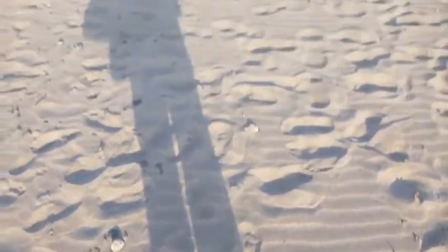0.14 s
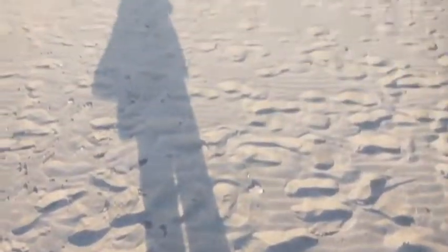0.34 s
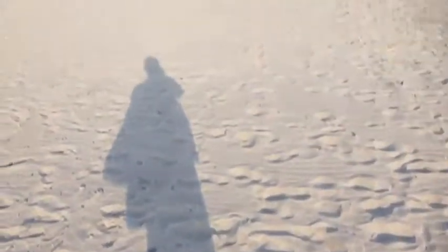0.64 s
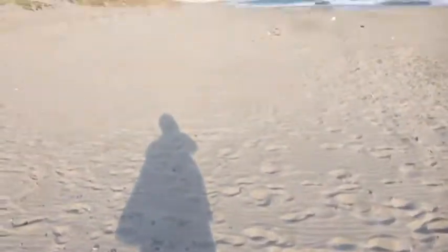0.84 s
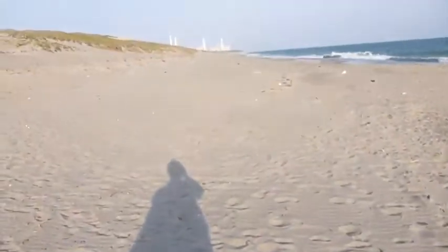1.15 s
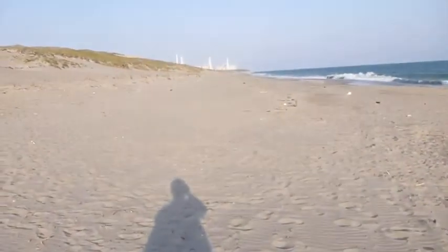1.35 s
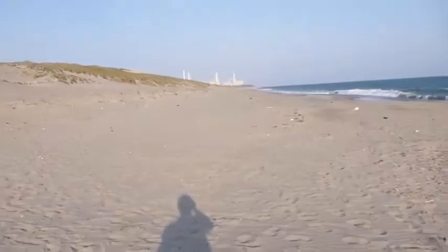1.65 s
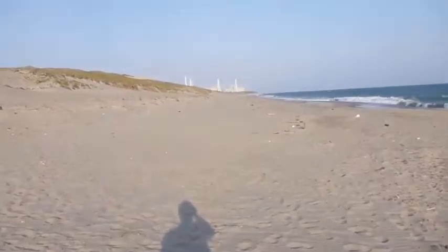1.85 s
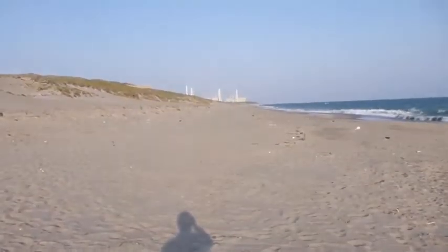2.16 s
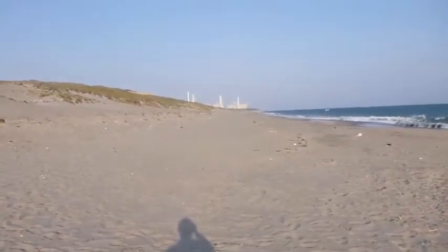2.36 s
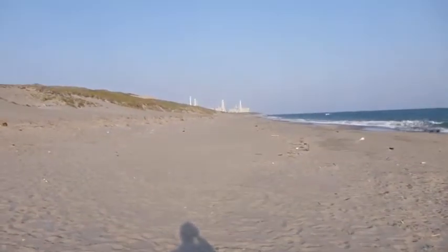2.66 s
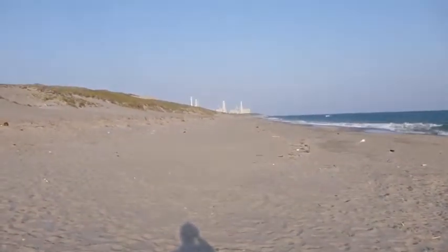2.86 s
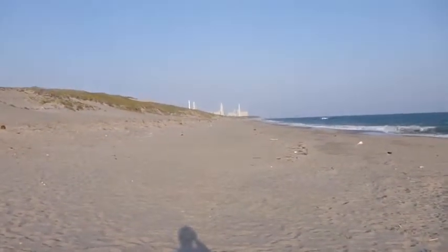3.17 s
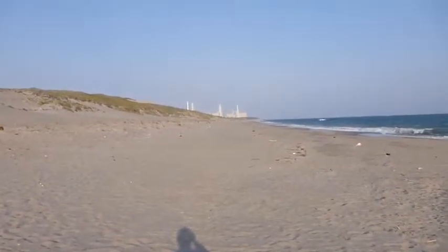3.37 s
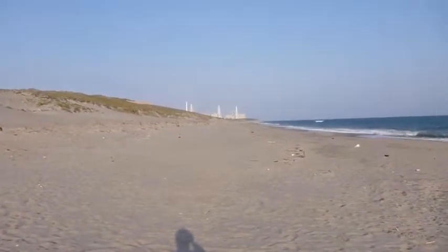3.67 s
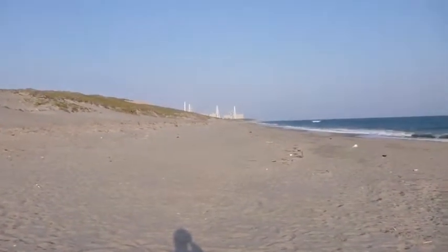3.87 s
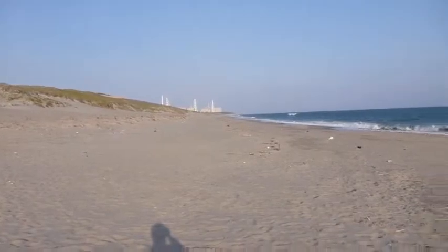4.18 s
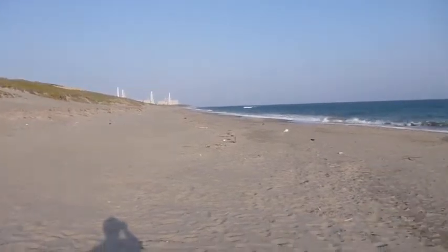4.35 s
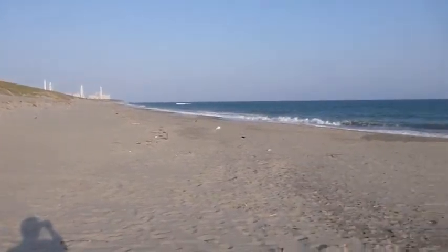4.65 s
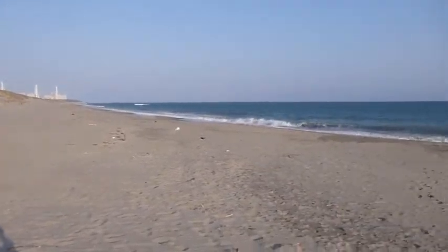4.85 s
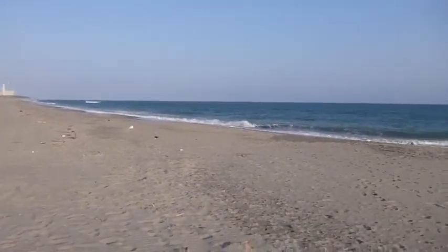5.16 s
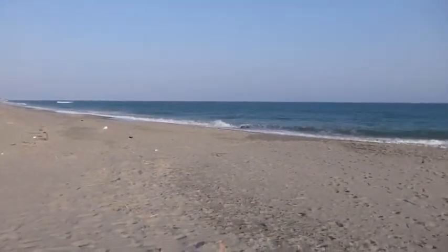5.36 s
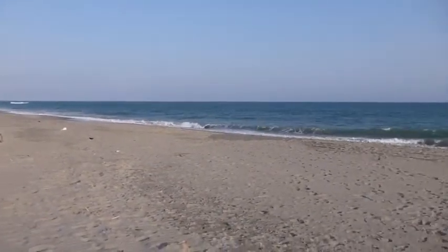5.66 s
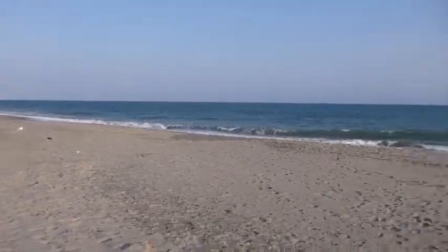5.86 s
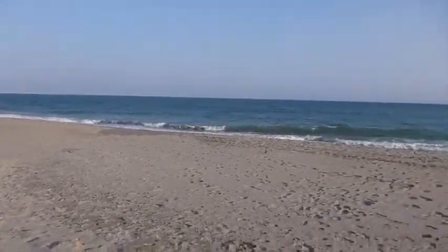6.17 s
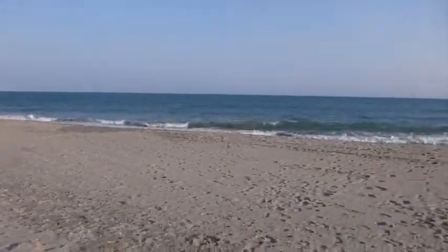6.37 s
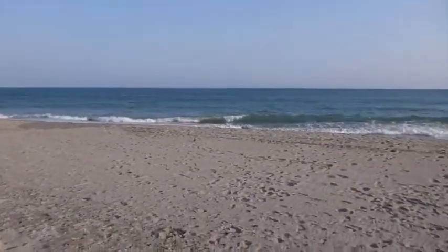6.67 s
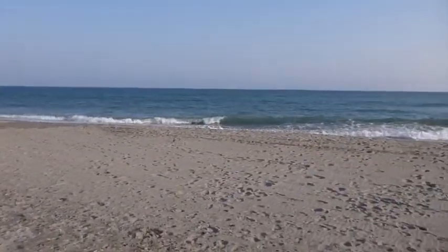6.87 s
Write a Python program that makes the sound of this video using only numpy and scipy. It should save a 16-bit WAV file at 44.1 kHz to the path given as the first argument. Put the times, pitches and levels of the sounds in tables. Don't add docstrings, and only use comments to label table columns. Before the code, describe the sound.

Distant surf hisses steadily on a sandy beach while wind slaps the microphone hard near the start, then keeps fluttering and puffing, with faint hoots later.

```python
import sys
import numpy as np
from scipy import signal
from scipy.fft import rfft, irfft
from scipy.io import wavfile
from scipy.ndimage import uniform_filter1d

SR = 44100
rng = np.random.default_rng(int(sys.argv[2]) if len(sys.argv) > 2 else 0)


def gain_from_db(level_db):
    decades = np.asarray(level_db, float) / 20
    return 10 ** decades


def store_pcm(level_fs):
    pcm = np.round(np.clip(level_fs, -1, 1) * 32767).astype(np.int16)
    wavfile.write(sys.argv[1], SR, np.atleast_2d(pcm).T)


N = 309582

# (time [s], hiss level [dB], wash against hiss [dB])
SURF_LEVELS = [(0, -48, .5), (.7, -48, 1.5), (.9, -47.5, 2), (1.099, -48.5, -0.5), (1.35, -51, -0.5),
               (1.6, -52.5, 1), (1.9, -54.5, 1), (2.4, -57, .5), (2.7, -55.5, -0.5), (3.1, -57, 0),
               (3.5, -54.5, -2), (4, -56.5, -1), (4.5, -56.5, -0.5), (5, -54.5, -0.5), (5.5, -52.5, -.5),
               (6.1, -51, 0), (6.6, -50, 0), (7.02, -49.5, -2)]
# (frequency [Hz], spectrum level [dB per Hz])
FOAM_SPECTRUM = [(25, -11), (60, -16.5), (130, -9.5), (230, 0.5), (550, 0), (1000, -3), (1500, -10.5),
                 (2500, -12.5), (3300, -18.5), (5000, -23), (7500, -29), (10500, -29.5), (13000, -28),
                 (15800, -41.5)]
CALM_DB, ROAR_PER_DB, BOOM_PER_DB, BOOM_DB = -49.5, 0.08, 0.4, 1

# (time [s], level [dB])
WIND_LEVELS = [(0, -58), (.66, -57), (.82, -43), (1.55, -44.5), (1.95, -45), (2.38, -44), (2.52, -49.5),
               (2.83, -41.5), (2.95, -50), (3.1, -52), (3.25, -46), (3.7, -46), (4.2, -44.5), (4.6, -54),
               (4.75, -52.5), (5.7, -53), (6.5, -43), (7.02, -54)]
FLUTTER_DB, FLUTTER_PER_S = 3, 24
BREEZE_DB, RIPPLE_DB, RIPPLE_HZ = 4, 3.5, 235

# (time [s], spread [ms], level [dB], tearing [dB])
GUST_PUFFS = [(.828, 6, -9, -4), (.845, 3.93, -13, -6), (.857, 4.3, -15, 2), (.880, 5.2, -10, -2),
              (0.911, 7.2, -20, -2), (.951, 12.8, -13.5, -2.5), (.992, 8, -17.5, 2.5),
              (1.024, 10.3, -20, 3), (1.059, 8, -18, 2.5), (1.095, 15.7, -21, 0), (1.14, 20, -23, -7),
              (1.205, 16, -19.5, -5), (1.245, 16, -21, 9.5), (1.275, 10.7, -18, 3), (1.326, 32, -29.5, 1),
              (1.364, 2.74, -17.5, 1.5), (1.442, 17.4, -28, 5), (1.509, 18, -23, 5)]
GUST_S, GUST_HZ, SLACK_HZ, SLACKEN_S = .82, 560, 300, .25
# (time [s], spread [ms], level [dB], eddy pitch [Hz])
SINGLE_PUFFS = [(.711, 1.9, -18, 300), (1.255, 18, -25.5, 681), (1.612, 15.6, -28.5, 244),
                (1.686, 3.45, -25.5, 171.5), (1.807, 9.5, -28.5, 317.6), (2.06, 14, -44, 222),
                (2.206, 2.53, -21, 264), (2.338, 11.6, -26.5, 302.2), (2.442, 10.5, -33.5, 267),
                (2.583, 30, -35, 254.5), (2.758, 10.3, -30.5, 238), (2.831, 15.2, -27, 240),
                (3.039, 11.8, -34, 213), (3.235, 31.3, -29, 261), (3.443, 9.7, -23.5, 257),
                (3.585, 10.5, -31, 370.7), (3.681, 17.3, -25, 273.6), (3.834, 19.7, -30, 257.3),
                (3.897, 14.8, -30.5, 249), (3.98, 21.7, -32, 270), (4.155, 11.3, -26, 271),
                (4.195, 10, -26.5, 268.6), (4.279, 6.1, -33, 255), (4.627, 7, -33, 167),
                (6.219, 3, -26.5, 401), (6.412, 10.2, -28, 311.4), (6.464, 5.8, -27, 284),
                (6.521, 10.2, -31.5, 247.6), (6.734, 16.6, -31.5, 306), (7.008, 8.1, -31, 256.5)]
TIGHT, TIGHT_BY_PITCH, TIGHT_BY_SPREAD = 4.92, 1.24, -0.24
# (pitch ratio, level [dB], tightness)
TORN_SHREDS = [(2.099, -19.5, 7.9), (4.202, -39, 9.7)]
WAKE_HZ, WAKE_DB, WAKE_SHARE = 115.5, -43.5, 0.57
# (time [s], peak level [dB], pitch [Hz])
LONE_EDDIES = [(0.8184, 3.5, 488), (.877, -8, 640), (1.018, -11.5, 560), (1.192, -27, 590),
               (1.215, -17, 610), (1.338, -29, 545), (1.363, -19, 394), (1.397, -17.5, 386),
               (1.483, -21, 504), (1.517, -13, 420), (1.599, -22, 480), (1.82, -20.5, 418),
               (1.952, -28, 240), (2.337, -16, 376), (2.852, -21, 383), (3.161, -24, 593),
               (3.226, -23, 450), (3.424, -19, 447), (3.56, -14, 590), (3.582, -7.5, 373),
               (3.668, -21, 332), (3.964, -19.5, 446), (4.066, -19, 199), (4.134, -14.5, 412),
               (4.905, -27, 169), (5.181, -26, 226), (5.781, -25, 280), (6.282, -14, 332),
               (6.629, -17, 360), (6.719, -13, 327)]
SLAP_TIGHT, SLAP_BY_PITCH = 4.4, .8
# (time [s], peak level [dB], pitch [Hz], tightness)
SHORT_TICKS = [
    (.8185, -33, 2760, 3.3),
    (.888, -32, 4000, 2.4),
    (0.989, -46, 2500, 2.2),
    (1.388, -41.5, 4480, 1.1),
    (1.413, -43.5, 5000, 1.4),
    (1.454, -37, 2300, 30),
]
# (time [s], spread [ms], level [dB], pitch [Hz])
BOTTLE_HOOTS = [
    (4.838, 10.3, -37.5, 197),
    (5.765, 16, -34, 282.6),
    (6.05, 28, -32, 257.5),
    (6.15, 25.4, -36.5, 253),
    (6.218, 3.4, -17.5, 264),
    (6.254, 5.1, -22.5, 285),
    (6.278, 11.8, -23.5, 300),
    (6.571, 7, -30.5, 347),
]
HOOT_TIGHT = 41

# (starting wind level [dB], ducking rate [dB/s per dB above], recovery time [s])
GAIN_STAGES = [(-21, 25, 0.43), (-33, 6.5, 0.076)]
SENSE_MS, SENSE_LOW_DB = 10.3, 4.5
LAG_MS = 25
# (time [s], duck [dB])
AIR_SHOVES = [(.72, 4), (1.09, 4.5), (1.53, 4), (1.82, 3.5), (2.25, 4), (2.74, 5.5), (2.85, 3), (3.28, 2.5),
              (3.58, 5.5), (3.68, 1), (4.03, 1.5), (4.6, 2.5), (6.23, 1), (6.4, 0.5), (6.54, 3)]
SHOVE_S, SHOVE_BACK_S = 0.0098, 0.08

LOW_CUT_HZ, TOP_HZ = 65, 15720
# (frequency [Hz], width [Hz], depth [dB])
MOTOR_NOTCHES = [(2870, 257, -25), (7900, 110, -5), (11720, 1400, -13), (11720, 220, -16)]


def walk(rate):
    hold = int(SR / rate)
    held = np.repeat(rng.standard_normal(N // hold + 1), hold)
    return 0.79 * uniform_filter1d(uniform_filter1d(held, hold), hold)[:N]


def unit(x):
    return x / np.sqrt(np.mean(x ** 2))


def surf(hiss_db, roar_db, wash_db, boom_db):
    hz = np.maximum(np.arange(N // 2 + 1) * SR / N, 1)
    foam_hz, foam_db = np.transpose(FOAM_SPECTRUM)
    colour_db = np.interp(np.log(hz), np.log(foam_hz), foam_db)
    noise = rfft(rng.standard_normal(N)) * gain_from_db(colour_db)
    noise /= np.std(irfft(noise * (hz > 4000) * (hz < 11000), N))
    bands = np.arange(20)
    swell = uniform_filter1d(np.array([walk(6.2) for _ in bands]), size=5, axis=0)
    out = 0
    for k in bands:
        place = 2 * np.log2(hz / 22) - k
        band = irfft(noise * np.cos(np.pi / 2 * np.clip(place, -1, 1)) ** 2, N)
        centre = 22 * 2 ** (k / 2)
        lift_db = roar_db / (1 + (centre / 700) ** 2)
        lift_db = lift_db + wash_db * np.exp(-np.log(centre / 1600) ** 2 / 0.22)
        lift_db += boom_db / (1 + (centre / 220) ** 4)
        out = out + band * gain_from_db(lift_db + 0.89 * swell[k] + 0.38 * walk(25))
    return out * gain_from_db(hiss_db)


def eddy(t, hz, phase, tight):
    turn = 2 * np.pi * hz * t / tight
    envelope = (1 + turn ** 2) ** (-(tight + 1) / 2)
    return envelope * np.cos((tight + 1) * np.arctan(turn) + phase)


def add(out, s, hz, gain, phase, tight):
    half = int(min(600, 2.2 * SR / hz.min()))
    reach = np.arange(-half, half)
    place = np.round(s * SR).astype(int)[:, None] + reach
    wave = eddy(reach / SR, hz[:, None], phase[:, None], tight)
    wave = gain[:, None] * wave * np.hanning(len(reach))
    out += np.bincount(np.clip(place, 0, len(out) - 1).ravel(), wave.ravel(), len(out))


def breeze(db):
    chance = rng.random((1100, 4)).T
    pitch = 100 * np.exp(0.36 * (chance[1] - .5))
    gain = gain_from_db(-3.9 * np.log(chance[2] + 0.032))
    out = np.zeros(N)
    add(out, chance[0] * N / SR, pitch, gain, 2 * np.pi * chance[3], 2.2)
    return unit(out) * gain_from_db(db)


def ripples(db):
    chance = rng.random((1600, 4)).T
    pitch = RIPPLE_HZ * np.exp(0.82 * (chance[1] - .5))
    gain = gain_from_db(-4.5 * np.log(chance[2] + 0.018))
    out = np.zeros(N)
    add(out, chance[0] * N / SR, pitch, gain, 2 * np.pi * chance[3], 2.6)
    return unit(out) * gain_from_db(db)


def add_puff(out, s, spread, db, hz, tight, scatter_db):
    chance = rng.random((600, 4)).T
    when = np.cumsum(.35 + .9 * chance[0]) / hz
    keep = when < 6 * spread
    gain = np.exp(-(when / spread - 3) ** 2 / 4) * gain_from_db(-scatter_db * np.log(chance[2] + .02))
    off_centre = chance[1] - np.average(chance[1], weights=gain ** 2)
    pitch = hz * np.exp(1.73 / np.sqrt(tight) * off_centre)
    puff = np.zeros(int(6 * spread * SR) + 1200)
    lead = 600 / SR
    add(puff, lead + when[keep], pitch[keep], gain[keep], 2 * np.pi * chance[3][keep], tight)
    puff *= gain_from_db(db) * np.sqrt(np.sqrt(2 * np.pi) * spread * SR / np.sum(puff ** 2))
    start = int((s - 3 * spread - lead) * SR)
    out[start:start + len(puff)] += puff


def add_torn_puff(out, s, spread_ms, db, hz, tear_db):
    spread = max(spread_ms, 1.) / 1000
    tight = TIGHT * (hz / 300) ** TIGHT_BY_PITCH * (spread / .01) ** TIGHT_BY_SPREAD
    add_puff(out, s, spread, db - .3, .92 * hz, tight, scatter_db=3.5)
    wake_db = WAKE_DB + WAKE_SHARE * (db + 27)
    add_puff(out, s, max(spread, .012), wake_db, WAKE_HZ, 1.2, scatter_db=-2.5)
    for ratio, shred_db, shred_tight in TORN_SHREDS:
        add_puff(out, s, .85 * spread, db + shred_db + tear_db, ratio * min(hz, 430), shred_tight,
                 scatter_db=6.0)


def puffs():
    out = np.zeros(N + SR)
    for s, spread_ms, db, tear_db in GUST_PUFFS:
        hz = SLACK_HZ + (GUST_HZ - SLACK_HZ) * np.exp(-(s - GUST_S) / SLACKEN_S)
        add_torn_puff(out, s, spread_ms, db, hz, tear_db)
    for s, spread_ms, db, hz in SINGLE_PUFFS:
        add_torn_puff(out, s, spread_ms, db, hz, 0)
    for s, spread_ms, db, hz in BOTTLE_HOOTS:
        add_puff(out, s, spread_ms / 1000, db, hz, HOOT_TIGHT, scatter_db=3.5)
    s, db, hz = np.transpose(LONE_EDDIES)
    slap_tight = SLAP_TIGHT * (hz[:, None] / 400) ** SLAP_BY_PITCH
    add(out, s, hz, gain_from_db(db), np.full(len(s), -1.3), slap_tight)
    s, db, hz, tight = np.transpose(SHORT_TICKS)
    add(out, s, hz, gain_from_db(db), 0 * s, tight[:, None])
    return out[:N]


def ducking(wind):
    level_db = 10 * np.log10(uniform_filter1d(wind ** 2, int(SENSE_MS * SR / 1000)) + 1e-9)
    held = 0
    for db, rate, back_s in GAIN_STAGES:
        excess_db = np.maximum(level_db - db, 0)
        held = held + signal.lfilter([rate / SR], [1, -np.exp(-1 / (back_s * SR))], excess_db)
    pole = np.exp(-1000 / (LAG_MS * SR))
    gain_db = -signal.lfilter([1 - pole], [1, -pole], held)
    for s, db in AIR_SHOVES:
        since = np.maximum(np.arange(N) / SR - s, 0)
        gain_db = gain_db - db * (1 - np.exp(-since / SHOVE_S)) * np.exp(-since / SHOVE_BACK_S)
    return gain_db


def scene():
    t = np.arange(N) / SR
    s, hiss_db, wash_db = np.transpose(SURF_LEVELS)
    hiss_db, wash_db = np.interp(t, s, hiss_db), np.interp(t, s, wash_db)
    wind_db = np.interp(t, *np.transpose(WIND_LEVELS))
    flutter_db = wind_db + FLUTTER_DB * walk(FLUTTER_PER_S)
    low = breeze(flutter_db + BREEZE_DB)
    gusts = ripples(flutter_db + RIPPLE_DB) + puffs()
    hiss_db = hiss_db + ducking(gusts + gain_from_db(SENSE_LOW_DB) * low)
    lively_db = wind_db - CALM_DB
    sea = surf(hiss_db, ROAR_PER_DB * lively_db, wash_db, BOOM_DB + BOOM_PER_DB * lively_db)
    return (sea + low + gusts)[None]


def band_limit(x):
    return signal.sosfilt(signal.butter(12, 15750, fs=SR, output="sos"), x)


def record(dry):
    x = signal.lfilter(*signal.butter(2, LOW_CUT_HZ, "high", fs=SR), dry)
    for hz, width, db in MOTOR_NOTCHES:
        x = x - (1 - gain_from_db(db)) * signal.lfilter(*signal.iirpeak(hz, hz / width, fs=SR), x)
    top_cut = signal.ellip(10, .1, 80, TOP_HZ, fs=SR, output="sos")
    x = signal.sosfilt(top_cut, np.clip(x, -.97, .97))
    x = signal.lfilter(*signal.butter(1, 60, "high", fs=SR), x)
    return band_limit(x)


dry = scene()
out = record(dry)
store_pcm(out)
```